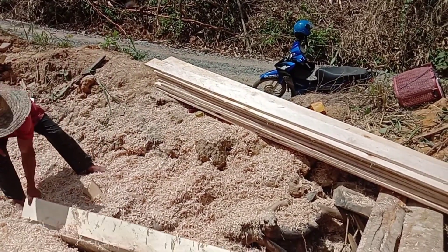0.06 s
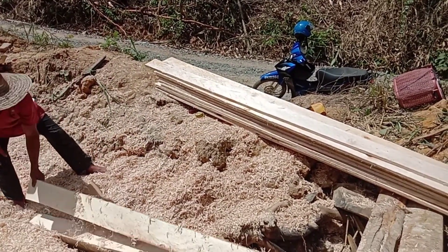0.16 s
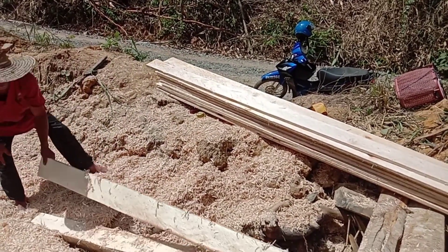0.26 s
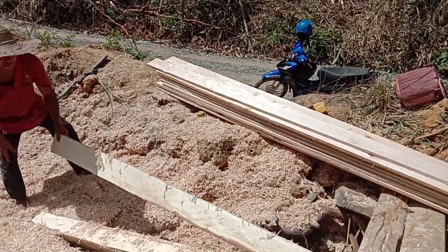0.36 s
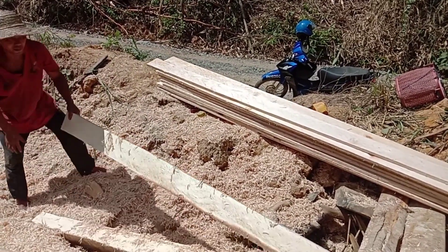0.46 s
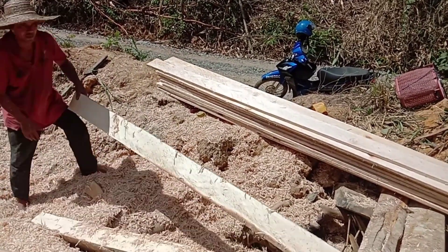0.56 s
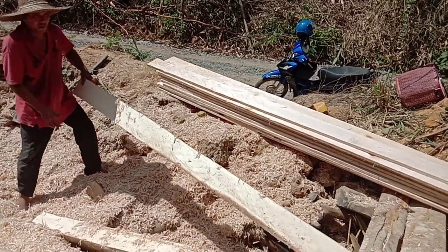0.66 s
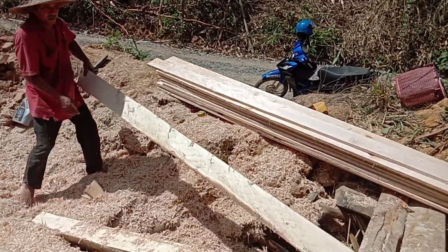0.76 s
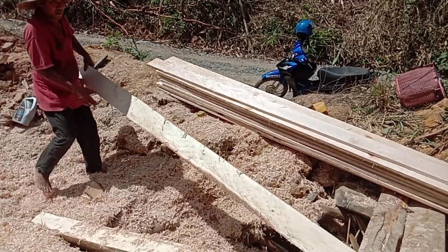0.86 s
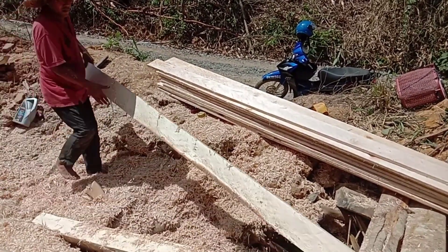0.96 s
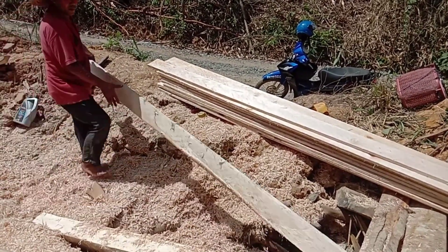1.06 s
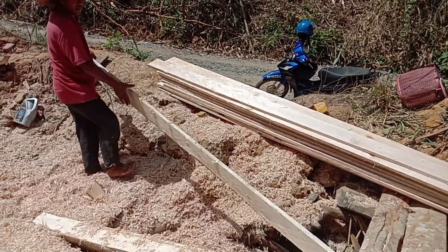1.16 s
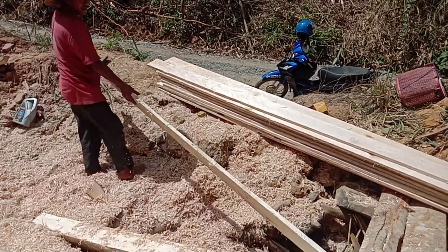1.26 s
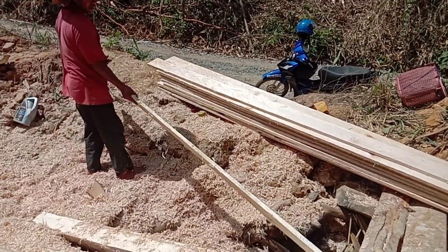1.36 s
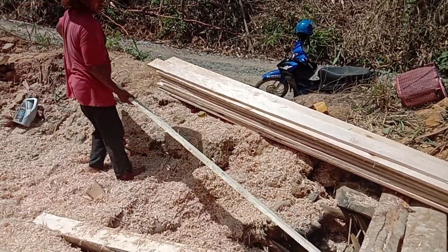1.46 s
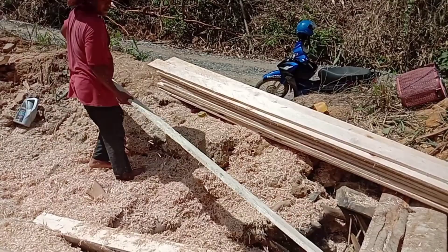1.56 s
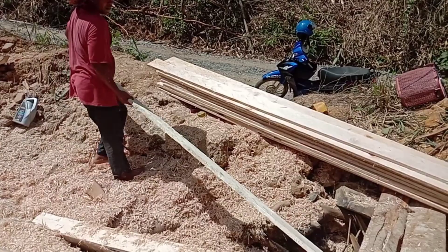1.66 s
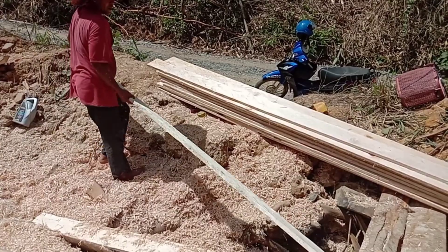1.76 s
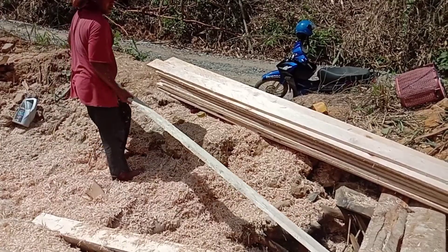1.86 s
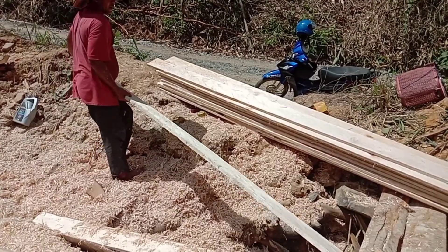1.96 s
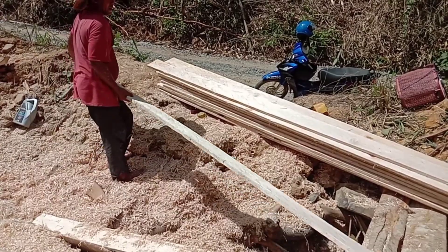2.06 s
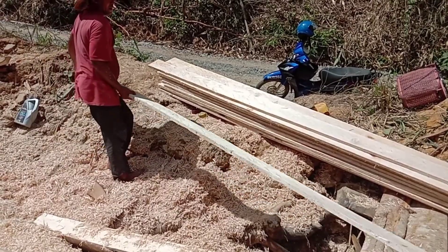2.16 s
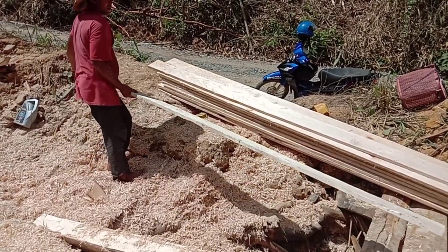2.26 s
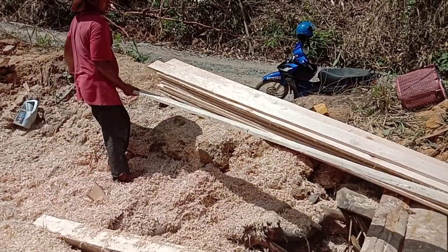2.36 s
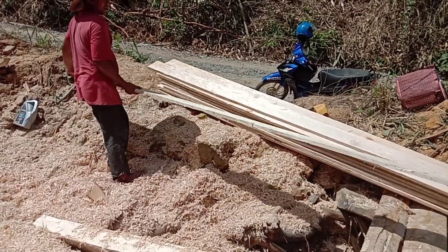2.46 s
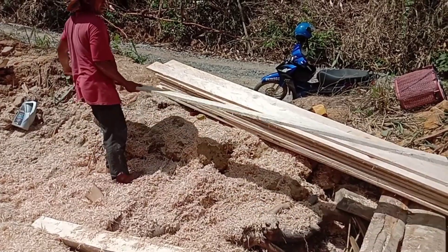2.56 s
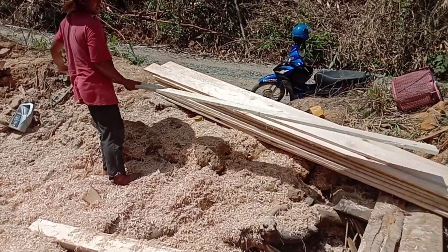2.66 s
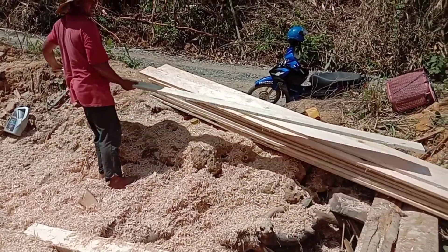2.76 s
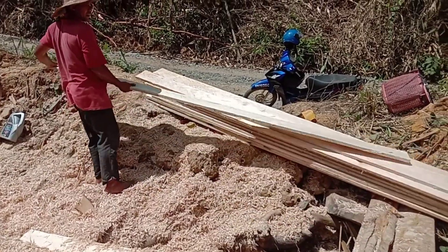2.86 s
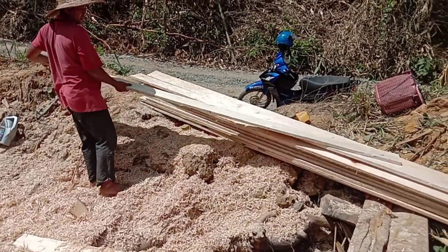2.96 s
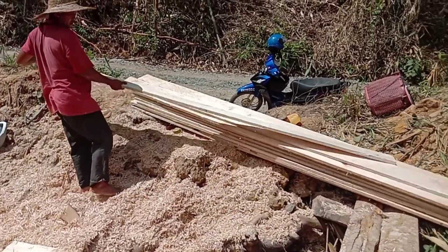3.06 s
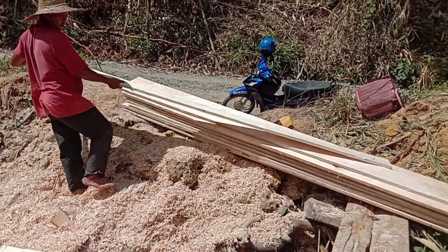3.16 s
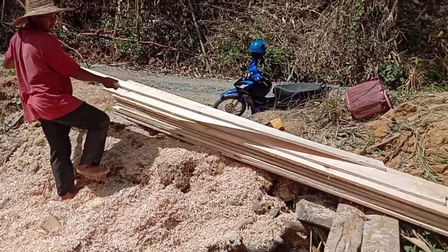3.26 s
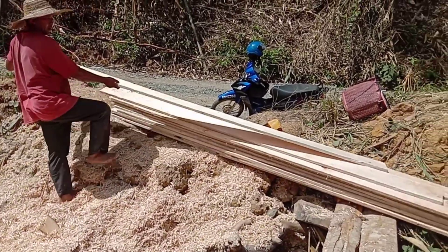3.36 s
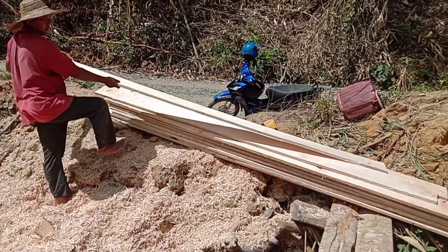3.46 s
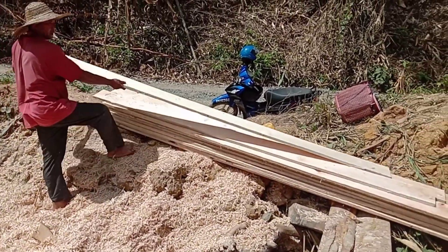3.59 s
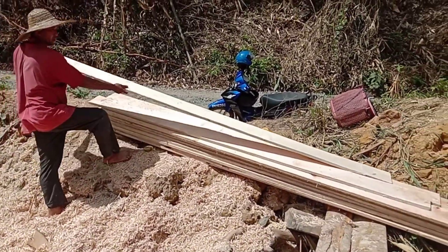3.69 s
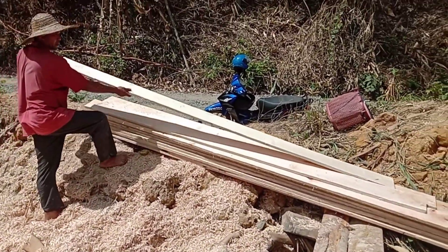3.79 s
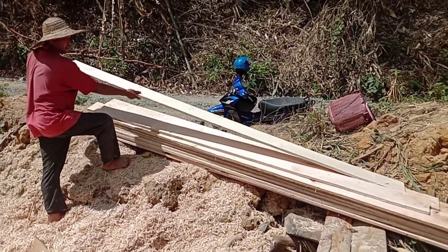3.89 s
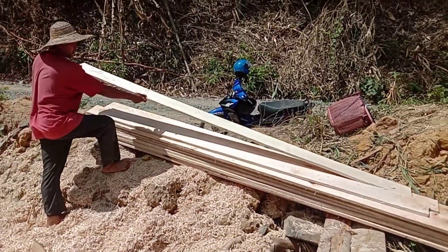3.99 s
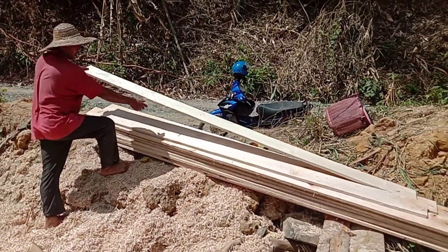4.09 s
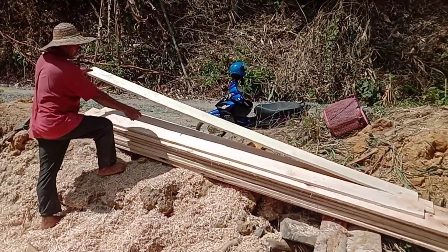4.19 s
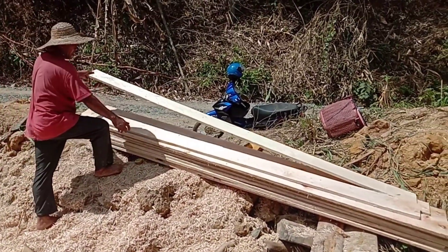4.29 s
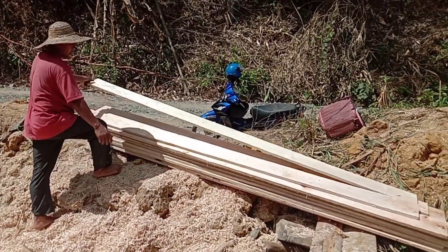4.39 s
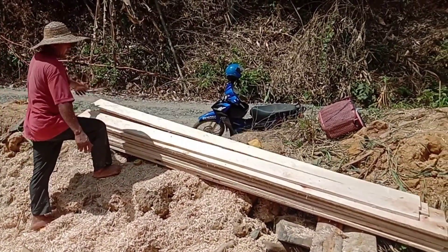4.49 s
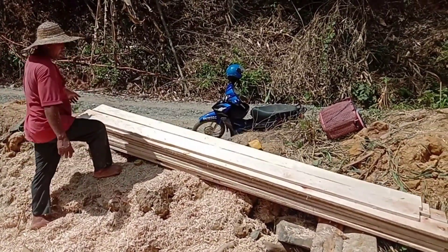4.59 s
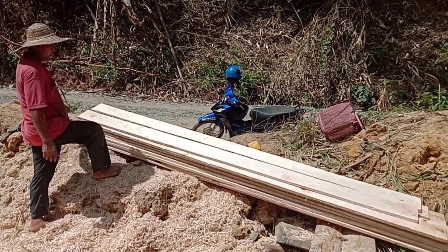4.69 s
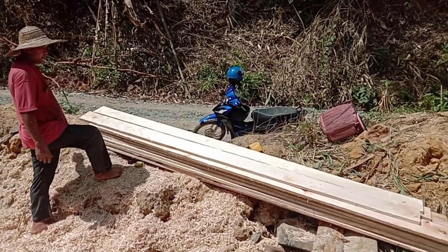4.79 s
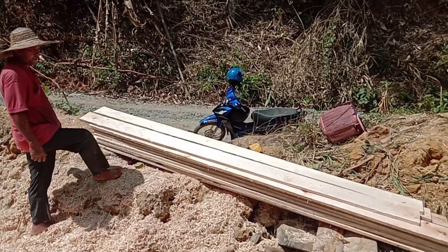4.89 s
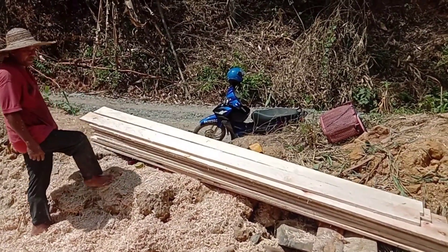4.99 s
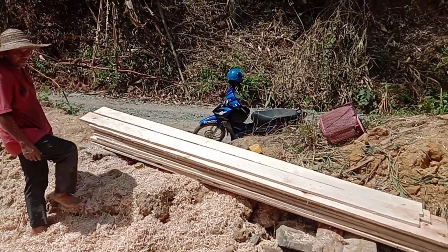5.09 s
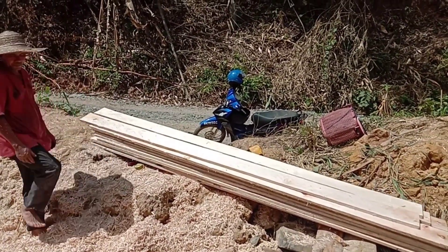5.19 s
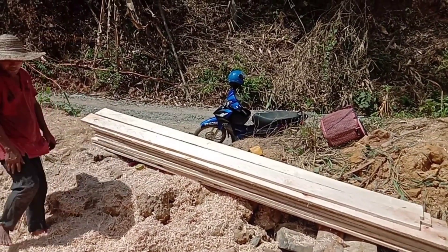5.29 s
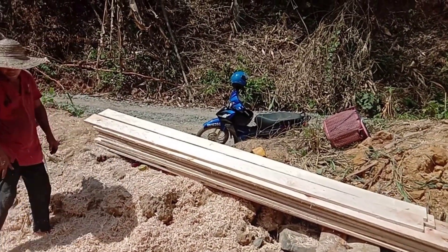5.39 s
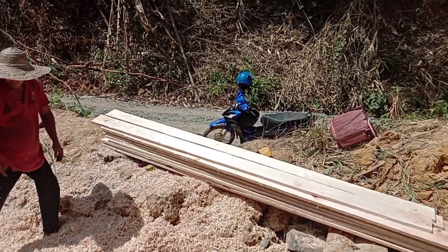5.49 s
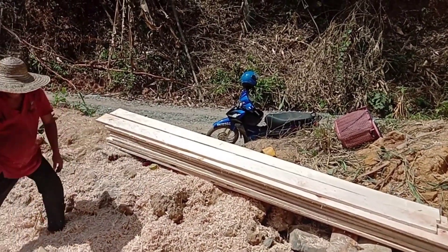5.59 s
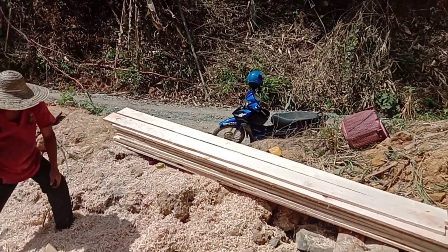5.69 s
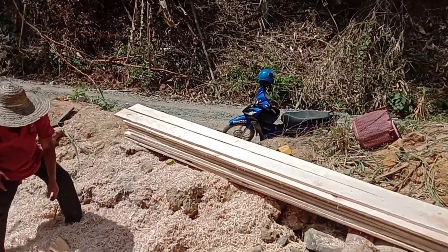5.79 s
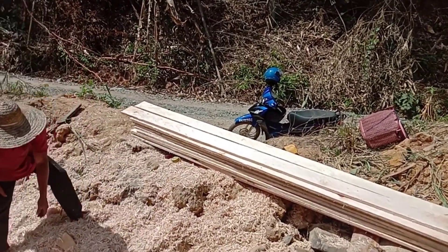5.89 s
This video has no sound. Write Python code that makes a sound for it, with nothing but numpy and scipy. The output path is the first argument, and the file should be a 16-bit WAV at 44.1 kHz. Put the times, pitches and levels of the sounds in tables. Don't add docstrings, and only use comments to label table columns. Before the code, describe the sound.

Close outdoor capture of timber handling. A plank is dragged with dry scraping and sharp ticks, its end lands in a hard knock and chatter, it shuffles softly, then falls flat with a loud crack and woody rattle. Cicadas, a high katydid, faint birds, a distant engine and light wind continue behind.

```python
import sys
import numpy as np
from scipy import signal
from scipy.fft import rfft, irfft, next_fast_len
from scipy.io import wavfile
from scipy.ndimage import uniform_filter1d, minimum_filter1d, map_coordinates

SR = 44100
rng = np.random.default_rng(int(sys.argv[2]) if len(sys.argv) > 2 else 0)


def boost(x):
    u = np.asarray(x, float) / 20
    return 10 ** u


def put_to_file(sound):
    columns = np.atleast_2d(sound).T
    safe = np.clip(columns, -1, 1)
    whole_steps = np.round(safe * 32767)
    wavfile.write(sys.argv[1], SR, whole_steps.astype(np.int16))


N = 261954

BLOW_RISE = 0.043


def unit(x):
    return x / np.sqrt(np.mean(x ** 2) + 1e-20)


def along(points, hz):
    f, v = np.transpose(points)
    return np.interp(np.log(hz + 1), np.log(f + 1), v)


def curves(rows, outside=None):
    s, *cols = np.transpose(rows)
    return np.array([np.interp(np.arange(N) / SR, s, c, outside, outside) for c in cols])


def wobble(rate_hz):
    knots = rng.standard_normal(int(N * rate_hz / SR) + 4)
    return map_coordinates(knots, [np.arange(N) * rate_hz / SR])


def swells(rows, rise_share):
    out = np.zeros((len(rows[0]) - 2, N))
    for peak_s, db, fade_s, *above_db in rows:
        fade_s = max(fade_s, 0.01)
        first = max(0, round((peak_s - 3 * rise_share * fade_s) * SR))
        last = min(N, round((peak_s + 3 * fade_s) * SR))
        t = np.arange(first, last) / SR - peak_s
        drop_db = 20 * np.maximum(-t / rise_share, t) / fade_s
        out[:, first:first + len(t)] += boost(db - drop_db + np.c_[[0, *above_db]])
    return out


def filtered(x, response):
    m = next_fast_len(N + SR // 2)
    return irfft(rfft(x, m) * response(np.fft.rfftfreq(m, 1 / SR)), m)[..., :N]


def ringing(modes):
    def mode(k, f, c, w, db):
        return (-1) ** k * boost(db) * 1j * f * w / (c * c - f * f + 1j * f * w)
    return lambda f: sum(mode(k, f, *row) for k, row in enumerate(modes))


def narrow_noise(hz, width_hz):
    return unit(filtered(rng.standard_normal(N), lambda f: ringing([(hz, width_hz, 0)])(f) ** 2))


def hiss(spectrum, patchy_db, bins):
    z = signal.stft(rng.standard_normal(N), nperseg=1024)[2]
    field = uniform_filter1d(rng.standard_normal(z.shape), size=bins, axis=0)
    field = uniform_filter1d(field, size=5, axis=1)
    patchy = signal.istft(z * boost(patchy_db * unit(field)), nperseg=1024)[1][:N]
    return unit(filtered(patchy, lambda hz: boost(along(spectrum, hz))))


def surroundings():
    # hz, level_db_per_hz
    air_spectrum = [(15, -76), (25, -22), (123, -5), (206, -8.5), (261, -9), (427, -15.5), (786, -16),
                    (863, -20.5), (1260, -22.5), (1480, -20), (1920, -13), (2990, -17), (3870, -18.5),
                    (6340, -23.5), (6800, -36), (8840, -60), (15000, -120)]
    # hz, width_hz, level_db
    air_modes = [(1263, 85, 17), (1820, 40, -21.5), (3900, 200, 7.5), (5580, 380, 1.5)]
    # peak_s, level_db, fade_20db_s
    low_swells = [(.14, -55, 0.16), (.63, -50, 0.22), (1.37, -52, 0.13), (2.86, -49, 0.23), (3.32, -54.5, 0.075),
                  (3.6, -65, 0.1), (4.025, -60, 0.051), (4.275, -59.5, 0.063), (4.57, -45.5, 0.16),
                  (5.1, -61, 0.087), (5.28, -62.5, 0.33), (5.86, -56, 0.26)]
    # peak_s, level_db, fade_20db_s
    wind_puffs = [
        (.2, -60, .08),
        (.75, -71, 0.54),
        (1.35, -72, 0.37),
        (1.88, -65, 0.32),
        (2.68, -64.5, 0.47),
        (2.76, -58, 0.19),
        (3.36, -68.5, .5),
        (4.38, -62.5, .3),
        (4.52, -49, 0.049),
        (5.8, -75, 1.1),
    ]
    air = hiss(air_spectrum, patchy_db=3.5, bins=3)
    gusts = boost(0.8 * wobble(5))
    air = air + filtered(air, lambda f: np.abs(ringing(air_modes)(f)))
    low_hum = (boost(-77.5) + swells(low_swells, 0.83)[0]) * narrow_noise(128, 30)
    wind = swells(wind_puffs, 0.94)[0] * narrow_noise(72, 50)
    return boost(-64.0) * gusts * unit(air) + boost(-2.5) * (low_hum + wind)


def cicadas():
    # start_s, level_db, throb_depth_db
    chorus = [
        (0.0, -49.5, 1),
        (1.75, -50.5, 0),
        (3.44, -50.5, -1.5),
        (3.94, -50, -1),
        (4.28, -49.5, 1.5),
        (5.94, -50, 1.5),
    ]
    # hz, level_db_per_hz
    song_spectrum = [(3650, -66), (6200, -39), (6610, -30), (7000, -10.5), (7220, 1), (7670, 3.5),
                     (8310, -3), (9030, -4), (9540, -19), (10400, -11.5), (11000, -27), (11200, -29),
                     (12000, -35.5), (15600, -72), (22000, -120)]
    chorus_db, depth_db = curves(chorus)
    throb = 2 * np.pi * (23.9 * np.arange(N) / SR + 0.27)
    strokes_db = depth_db * np.cos(throb) + 0.87 * np.cos(3 * throb) + 0.77 * np.cos(4 * throb)
    strokes_db = strokes_db + 0.44 * wobble(5.1) + 0.41 * wobble(250)
    return boost(chorus_db) * unit(boost(strokes_db) * hiss(song_spectrum, patchy_db=2.0, bins=3))


def katydid():
    # hz, level_db_per_hz
    wing_spectrum = [(11000, -50), (12500, -26), (13700, -22), (14150, -10), (14500, -3), (15200, 0),
                     (15600, 0), (16200, -60)]
    # peak_s, level_db, fade_20db_s (10 ms at least)
    chirps = [
        (.53, -64, 0),
        (.83, -65, -1.7),
        (1.32, -65, -1.5),
        (1.4, -71, .07),
        (1.83, -57, 0.1),
        (4.82, -68, -1.5),
        (5.25, -73.5, 0),
        (5.68, -66.5, -0.1),
    ]
    beat_hz, beat_peak_s, beat_depth_db = 4.69, 1.822, 1.5
    beat_db = beat_depth_db * np.cos(2 * np.pi * beat_hz * (np.arange(N) / SR - beat_peak_s))
    gain = boost(-66.5 + beat_db) + swells(chirps, 1.3)[0]
    flicker = boost(1.0 * wobble(25) + 1.3 * wobble(300))
    return boost(0.5) * gain * unit(flicker * hiss(wing_spectrum, patchy_db=0.0, bins=4))


def birds():
    # start_s, length_s, first_hz, last_hz, level_db
    bird_notes = [(1.384, 0.038, 2034, 2030, -59.5), (1.596, 0.042, 1116, 1095, -59.5),
                  (1.844, 0.051, 1760, 1690, -59), (2.093, 0.074, 1417, 1282, -61),
                  (2.201, 0.077, 520, 520, -68), (2.4, 0.12, 2060, 1900, -65.5),
                  (2.683, 0.069, 2120, 2070, -57.5), (3.88, 0.054, 644, 610, -58.5),
                  (4.048, 0.067, 464, 450, -62), (4.06, .06, 3150, 3100, -62),
                  (4.065, .04, 3560, 3540, -63), (4.188, 0.046, 4020, 4000, -65),
                  (4.283, 0.1, 480, 423, -65), (4.69, .08, 5340, 5440, -62), (4.782, .1, 5440, 5380, -65),
                  (4.85, 0.38, 1844, 1825, -65.5), (5.091, 0.056, 2480, 1887, -57.5),
                  (5.115, 0.11, 1915, 1900, -65.5), (5.167, 0.089, 4100, 3900, -66),
                  (5.594, 0.092, 4050, 4100, -66), (5.699, 0.081, 2060, 2040, -58.5),
                  (5.718, 0.083, 1820, 1777, -59.5)]
    out = np.zeros(N)
    flutter = boost(3.5 * wobble(140))
    waver = 1 + 0.05 * wobble(200)
    for s, length_s, first_hz, last_hz, db in bird_notes:
        u = np.linspace(0, 1, round(length_s * SR))
        start = round(s * SR)
        pitch_hz = first_hz + (last_hz - first_hz) * u
        pitch_hz = pitch_hz * waver[start:][:len(u)] ** (1500 / first_hz)
        tone = np.sin(2 * np.pi * np.cumsum(pitch_hz) / SR)
        out[start:][:len(u)] += boost(db) * np.sin(np.pi * u) * tone
    return out * flutter


def hill(x):
    # hz, t60_s
    hill_decay = [(200, 0.072), (1200, 0.31), (4000, 0.96), (8000, 0.94)]
    hz, t, z = signal.stft(rng.standard_normal(SR), SR, nperseg=256)
    tail = signal.istft(z * boost(-60 * t / along(hill_decay, hz)[:, None]), SR, nperseg=256)[1]
    delayed = np.pad(x, (900, 0))
    return signal.fftconvolve(delayed, tail / np.linalg.norm(tail))[:N]


def ducking(x, top_db, ratio):
    gain = np.minimum(1, boost(top_db) / (np.abs(x) + 1e-9)) ** ratio
    held = minimum_filter1d(gain, size=1100, origin=30)
    attack = uniform_filter1d(1 - held, size=80)
    release = signal.lfilter([0.0015], [1, -0.9985], 1 - held)
    return 1 - np.maximum(attack, release)


def narrow_note():
    # peak_s, level_db, fade_20db_s
    note_swells = [(1.208, -56, .06), (5.618, -60, 0.041), (1.79, -52, 0.17), (2.12, -58, 0.11), (2.29, -72, .05),
                   (2.725, -62, .02), (3.05, -56, 0.062), (3.3, -53.5, 0.07), (3.6, -55.5, 1), (3.894, -52, 0.11),
                   (4.3, -74, 0.16), (4.385, -49.5, 0.0098), (4.8, -50.5, 0.049), (5.05, -55.5, 0.08),
                   (5.332, -61.5, 0.074), (5.662, -61.5, 0.22)]
    return boost(-5.5) * swells(note_swells, 1)[0] * narrow_noise(1262, 80)


def sawdust():
    # peak_s, level_db, fade_20db_s
    pours = [
        (.152, -59, .15),
        (.163, -62, .1),
        (.177, -50, .12),
        (.19, -54, .15),
        (.206, -56, .05),
        (.244, -54, .02),
        (.25, -57, .5),
        (.6, -60, .15),
    ]
    # hz, level_db_per_hz
    chip_spectrum = [(600, -49), (1700, 3), (2400, 7.5), (3500, 2.5), (4900, -0.5), (5800, -4), (6900, 5),
                     (8000, 4), (10500, -19.5)]
    grains = boost(1.2 * wobble(400)) * hiss(chip_spectrum, patchy_db=3, bins=12)
    return swells(pours, BLOW_RISE)[0] * unit(grains)


def squeak():
    centre_s, hold_s, edge_s, squeak_db = 4.248, 0.11, 0.025, -64.5
    t = np.arange(N) / SR
    phase = 2 * np.pi * np.cumsum(446 + 5 * wobble(45)) / SR
    fade_db = 3 - 450 * np.clip(t - 4.24, 0, 1)
    overtones = boost(1.5) * np.sin(5 * phase) + boost(-1.5) * np.sin(6 * phase)
    tone = np.sin(2 * phase) + boost(fade_db) * overtones
    outside_s = np.clip(np.abs(t - centre_s) - hold_s / 2, 0, 1)
    return boost(squeak_db - 20 * outside_s / edge_s + 0.89 * wobble(120)) * tone


def registers(modes):
    tap = np.eye(1, N)[0]
    rings = []
    for low_hz, high_hz in [(900, 2600), (0, 900), (2600, SR)]:
        chosen = [m for m in modes if low_hz <= m[0] < high_hz]
        rings.append(filtered(tap, ringing(chosen))[:SR // 8])
    rings = np.array(rings)
    rings[2] = np.convolve(rings[2], [1, -2, 1])[:SR // 8]
    for row, hz in enumerate((3000, 1100, 7200)):
        rings[row] = signal.sosfilt(signal.butter(4, hz, fs=SR, output="sos"), rings[row])
    return rings / np.linalg.norm(rings, axis=1, keepdims=True)


def stroke(rows, boom_db, rasp_db):
    return boost(curves(rows, outside=-200) + np.c_[[0, boom_db, rasp_db]])


def contact(force, modes, per_s, spread_db, smooth, patchy_db):
    caught = rng.random(N) < per_s / SR
    catches = caught * boost(spread_db * rng.exponential(size=N)) * rng.standard_normal(N)
    rub = hiss([(20, 0), (SR, 0)], patchy_db, bins=3)
    rough = unit(unit(catches) + smooth * rub)
    return signal.fftconvolve(rough * force, registers(modes), axes=1)[:, :N].sum(0)


def blows(events, modes):
    force, t = np.zeros((3, N)), np.arange(SR // 50) / SR
    for s, db, boom_db, rasp_db in events:
        click = np.c_[[9, 20, 3]] * (t == 0)
        burst = boost(-60 * t / 0.0083) * (rng.standard_normal(len(t)) + click)
        burst = burst / np.linalg.norm(burst, axis=1, keepdims=True)
        gain = boost(db + 13.0 + np.array([[0], [boom_db + 7.0], [rasp_db + 9.5]]))
        force[:, round(s * SR):][:, :len(t)] += gain * burst
    return signal.fftconvolve(force, registers(modes), axes=1)[:, :N].sum(0)


def drag():
    # hz, width_hz, level_db
    plank_modes = [(115, 71, -8), (179.9, 29, -1), (273, 68, -2), (480, 23, -2.5), (662, 480, -4.5),
                   (805, 330, -5.5), (1072, 210, -1), (1254, 42, 8), (1576, 170, 2.5), (2060, 200, -0.5),
                   (2360, 390, -10), (2660, 210, -3), (3740, 310, -13.5), (4480, 690, -22),
                   (5940, 550, -28.5)]
    # time_s, pressure_db
    pull = [
        (.11, -74),
        (.18, -52),
        (.41, -54),
        (.46, -47.5),
        (.575, -44),
        (.62, -42),
        (.81, -45),
        (.95, -51),
        (1.07, -69.5),
    ]
    # peak_s, knock_db, fade_20db_s, boom_above_knock_db, rasp_above_knock_db
    short_rubs = [
        (.04, -53, .07, -14, -11),
                  (.625, -56, 0.29, 8.5, -2.5), (.745, -48.5, 0.2049, -7, -11), (.845, -76, -1, -18, -12),
              (1.21, -68.5, 0.32, 3.5, -17), (1.33, -58.5, 0.14, 1, -1), (1.4, -70, 0.12, -15, -2),
              (1.615, -64.5, 0.12, -23, -10.5), (1.771, -52.5, 0.05, -3.5, -8.5),
              (2.146, -64.5, 0.22, -8, -15), (2.6, -74.5, 3, -1.5, -10), (4.95, -67, 0.45, -8, -17),
              (5.66, -68.5, 0.5, -15.5, -4)]
    # start_s, peak_db, boom_above_peak_db, rasp_above_peak_db
    ticks = [(0.2436, -44, -10, -8), (.601, -35, -18, -13), (0.6075, -32, -9, -16), (.622, -37, -16, -24),
             (0.7318, -32, -33, -35), (.7665, -33, -25, -12), (.7755, -27, -30, -22),
             (.8012, -31, -28, -25), (.8032, -29, -25, -23), (.8055, -29, -25, -19),
             (1.1938, -45.5, -10, -17), (3.2914, -53.5, -4.5, -10), (5.649, -56, -20, -15)]
    force = stroke(pull, boom_db=-2.5, rasp_db=-16) + swells(short_rubs, 0.33)
    scrape = contact(force, plank_modes, per_s=1500, spread_db=2.3, smooth=1.9, patchy_db=3.5)
    return scrape + blows(ticks, plank_modes)


def bump():
    # hz, width_hz, level_db
    landing_modes = [(119, 30, -8.5), (193, 28, -2.5), (300.5, 34, -5.5), (480, 55, -3.5), (610, 53, -3),
                     (712, 40, -12), (871, 160, -7.5), (950, 25, -1), (1158, 120, -4.5), (1256, 77, 0.5),
                     (1640, 255, -11.5), (1900, 110, -13.5), (2210, 150, -14.5), (2695, 79, -9),
                     (3660, 300, -25.5), (4550, 390, -28), (5800, 210, -39.5), (6700, 120, -38.5),
                     (9900, 1800, -34)]
    # start_s, peak_db, boom_above_peak_db, rasp_above_peak_db
    knocks = [(1.2674, -52, -6, -22), (1.3214, -54, -14, -9), (2.7524, -15, -1, -26),
              (2.757, -6.5, -10, -35), (2.7625, -13, -4.5, -31), (2.7705, -21.5, 4, -25),
              (2.7765, -20, -5, -29), (2.781, -24.5, 0.5, -29), (2.7855, -25, 6.5, -22),
              (2.8005, -31, 3, -29), (2.8045, -25, 6, -27), (2.811, -32, 1, -29), (2.8195, -26.5, 3.5, -28),
              (2.829, -29, -2, -23), (2.8415, -35.5, 8.5, -25), (2.888, -40, -17, -13),
              (2.918, -51.5, 13.5, -18), (2.9295, -31, 1, -26), (2.9345, -39, -6, -19),
              (2.943, -38, 4, -31), (2.9525, -45, 11, -32), (2.9635, -37.5, 1, -29), (2.9765, -46, 3, -27)]
    # peak_s, knock_db, fade_20db_s, boom_above_knock_db, rasp_above_knock_db
    chatter_rows = [
        (1.262, -47, 0.074, 11, -18),
        (1.315, -59, 0.07, 8, -14),
        (2.753, -20.5, 0.079, -2.5, -18),
        (2.762, -46.5, 0.042, 1.5, -0.5),
        (2.78, -54, 0.032, 2, 3),
        (2.797, -39.5, 0.032, 12.5, -12.5),
        (2.872, -45.5, 0.13, 3, -8),
        (2.932, -43, 0.066, 5, -25),
    ]
    chatter = contact(swells(chatter_rows, BLOW_RISE), landing_modes,
                      per_s=1400, spread_db=5.5, smooth=1.95, patchy_db=1.5)
    return blows(knocks, landing_modes) + boost(-3.5) * chatter


def nudge():
    # hz, width_hz, level_db
    resting_modes = [(120, 170, -10.5), (298, 290, -11), (620, 140, -5), (820, 150, -8.5), (1225, 110, -2),
                     (1810, 190, -4.5), (1980, 130, -4.5), (2340, 200, -5), (2623, 67, -1),
                     (3610, 140, -12.5), (4100, 300, -18), (5130, 500, -31.5)]
    # peak_s, knock_db, fade_20db_s, boom_above_knock_db, rasp_above_knock_db
    nudges = [
        (3.056, -64.5, 0.21, 1.5, -1.5),
        (3.21, -68, 0.18, -5, -18),
        (3.55, -68.5, 1, 1, -1),
        (3.884, -57.5, 0.45, -5.5, -4.5),
        (4.24, -103, 0.05, -5, -13),
        (4.306, -62.5, 0.059, -18, 0),
    ]
    return contact(swells(nudges, 0.93), resting_modes,
                   per_s=1200, spread_db=2.3, smooth=1.7, patchy_db=5)


def pitched_bursts():
    # start_s, peak_db, pitch_hz, length_ms
    short_bursts = [(.7677, -23.5, 2050, 4.3), (.7788, -30, 1340, 3.6), (1.2503, -30, 450, 3.4),
                    (1.24, -33, 520, 2.6), (1.2608, -32, 710, 3), (.8015, -40, 3800, 5.5),
                    (0.63, -41, 3000, 4.4), (0.27, -40, 7500, 4), (0.22, -37, 7000, 7.3),
                    (1.26, -42.5, 1230, 18), (1.323, -42, 140, 21), (2.752, -10.5, 680, 4.3),
                    (2.7535, -41, 6900, 5), (2.752, -20, 126, 23), (4.4032, -28, 1900, 2.9),
                    (4.408, -28.5, 203, 25), (4.4172, -14.5, 1380, 7), (4.439, -34.5, 4300, 14),
                    (4.446, -22.5, 1300, 28), (4.477, -25, 1265, 19), (4.508, -24, 1185, 16),
                    (4.54, -29.5, 1100, 32), (4.571, -32.5, 1250, 9.8), (4.525, -43, 430, 65),
                    (4.595, -47, 300, 43), (4.6, -47, 164, 41), (4.628, -44, 297, 28), (4.637, -47, 813, 26),
                    (4.642, -46, 575, 42), (4.655, -44, 247, 21), (4.668, -46, 613, 29), (4.678, -39, 220, 20),
                    (4.69, -52, 710, 41), (4.705, -51, 270, 27), (0.71, -61, 2780, 3)]
    # start_s, peak_db, pitch_hz, length_ms
    slam_crack = [
        (4.4161, -1.5, 1500, 1.9),
        (4.4163, -9, 2700, 1.3),
        (4.4162, -18, 5200, 1.7),
        (4.4163, -36, 7200, 2),
        (4.416, -41, 9700, 1.5),
    ]
    out = np.zeros(N)
    for s, db, hz, ms in short_bursts + slam_crack:
        u = np.arange(round(ms * SR / 1000)) / (ms * SR / 1000)
        swell = np.sin(np.pi * u ** 0.7) ** 2
        out[round(s * SR):][:len(u)] -= boost(db) * swell * np.sin(2 * np.pi * hz * ms * u / 1000)
    return out


def slam():
    # hz, width_hz, level_db
    stack_modes = [(120, 49, -13.5), (195.7, 62, -10), (288, 51, -5), (520, 81, -6.5), (638, 160, -7),
                   (881, 60, -3), (1063, 130, -7.5), (1264, 54, 2.5), (1522, 69, -5), (1690, 90, -6.5),
                   (1900, 160, -6.5), (2440, 270, -10), (2750, 190, -7.5), (3320, 750, -16.5),
                   (4330, 860, -19), (5470, 980, -29.5), (6260, 500, -43.5)]
    # start_s, peak_db, boom_above_peak_db, rasp_above_peak_db
    slaps = [(4.4215, -14.5, -14, -33.5), (4.4258, -19.5, -11.5, -34.5), (4.4305, -24, -4, -19.5),
             (4.4365, -32, -5.5, -14), (4.4424, -31.5, -8, -12), (4.4555, -18, -3, -26),
             (4.4605, -18, -17, -26), (4.4675, -17, -20, -20.5), (4.481, -22, -5.5, -25),
             (4.4905, -24, -3, -16), (4.4975, -23, -4.5, -25), (4.5027, -25.5, -0.5, -30),
             (4.509, -22.5, -1.5, -30), (4.5145, -24.5, -0.5, -32), (4.547, -22, -19, -28),
             (4.552, -22, -23, -28), (4.574, -22.5, -18.5, -31), (4.585, -35, -26, -10),
             (4.611, -30, -25, -16), (4.6494, -42, 4.5, -13.5), (4.689, -38, -10, -19.5)]
    # time_s, pressure_db
    fall = [
        (4.395, -42),
        (4.403, -38.5),
        (4.4145, -30.5),
        (4.419, -13),
        (4.435, -29),
        (4.509, -30.5),
        (4.545, -32.5),
        (4.78, -47),
        (4.95, -63.5),
    ]
    # peak_s, knock_db, fade_20db_s, boom_above_knock_db, rasp_above_knock_db
    settling = [
        (4.402, -38.5, 0.11, 7.7, -29.5),
        (4.43, -41.5, 0.13, 17.7, -16),
        (4.485, -39.5, 0.038, 12.4, -24),
        (4.64, -58.5, 0.064, 16.4, -6),
        (4.69, -67, 0.035, 10, -8),
    ]
    force = stroke(fall, boom_db=-26, rasp_db=-11) + swells(settling, BLOW_RISE)
    grind = contact(force, stack_modes, per_s=1400, spread_db=4.5, smooth=5.9, patchy_db=0.5)
    return blows(slaps, stack_modes) + boost(-3.5) * grind


def scene():
    hits = bump() + slam() + pitched_bursts()
    slide = drag() + sawdust() + nudge()
    wood = signal.sosfilt(signal.butter(3, 80, "high", fs=SR, output="sos"), slide + hits)
    far = boost(-21.5) * hill(hits) + cicadas() + katydid() + birds() + surroundings()
    return (wood + squeak() + narrow_note() + far * ducking(wood, top_db=-15, ratio=0.8))[None]


def low_pass(x):
    return signal.sosfilt(signal.butter(12, 16750, fs=SR, output="sos"), x)


def record(dry):
    mix = filtered(dry, lambda hz: hz < 15490)
    return low_pass(mix)


dry = scene()
out = record(dry)
put_to_file(out)
```